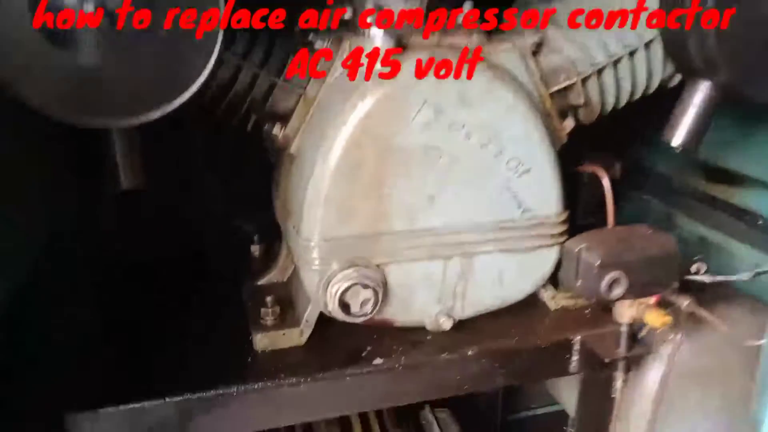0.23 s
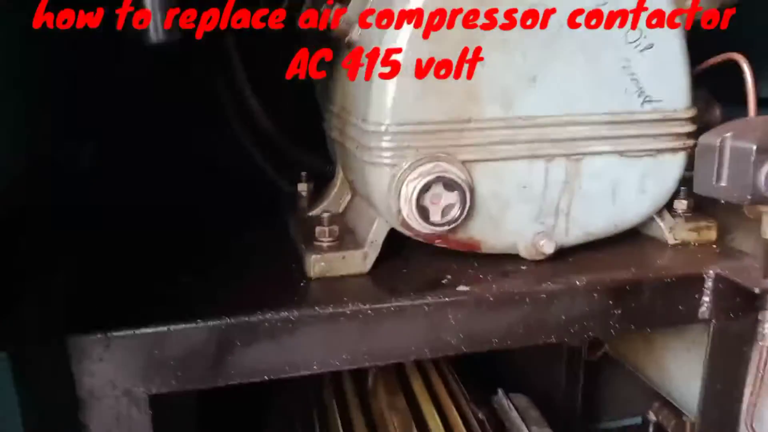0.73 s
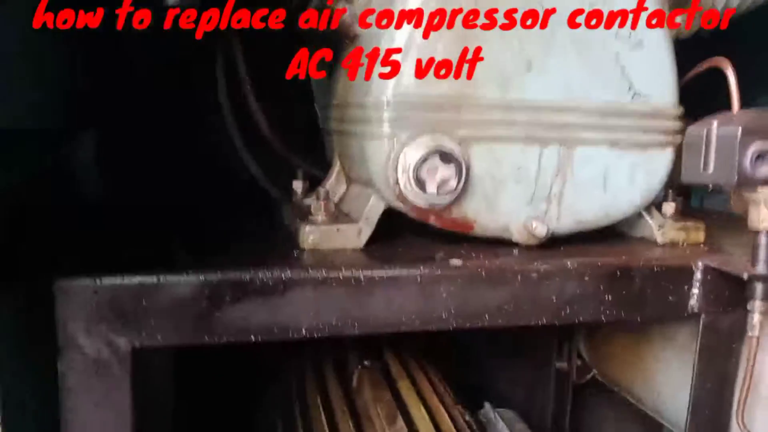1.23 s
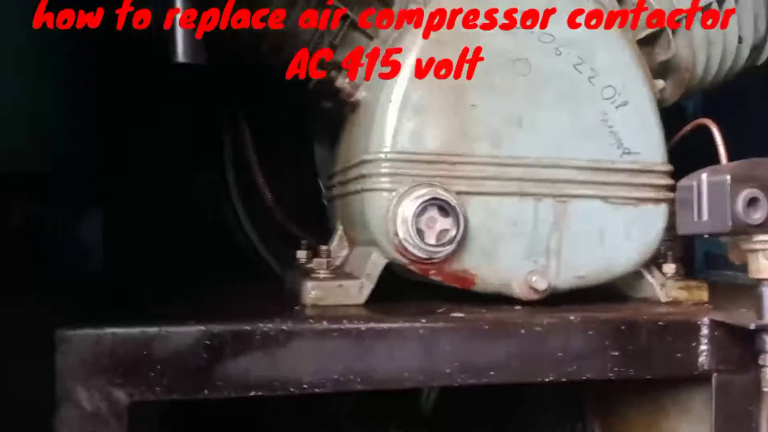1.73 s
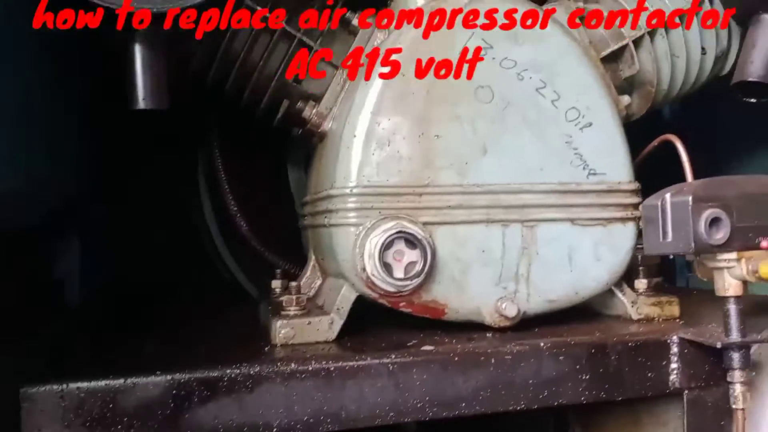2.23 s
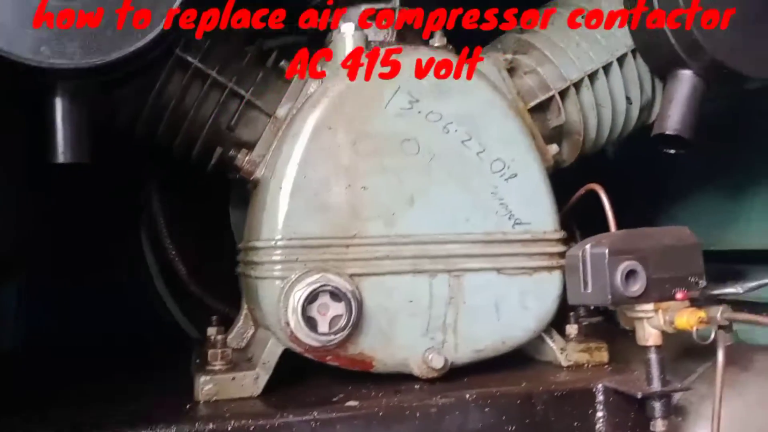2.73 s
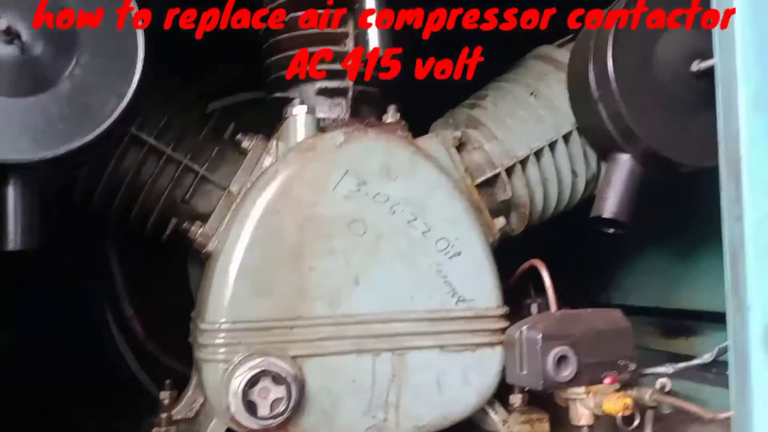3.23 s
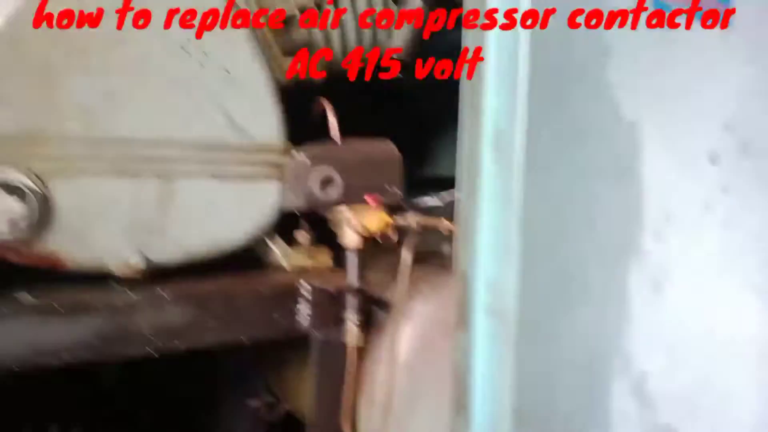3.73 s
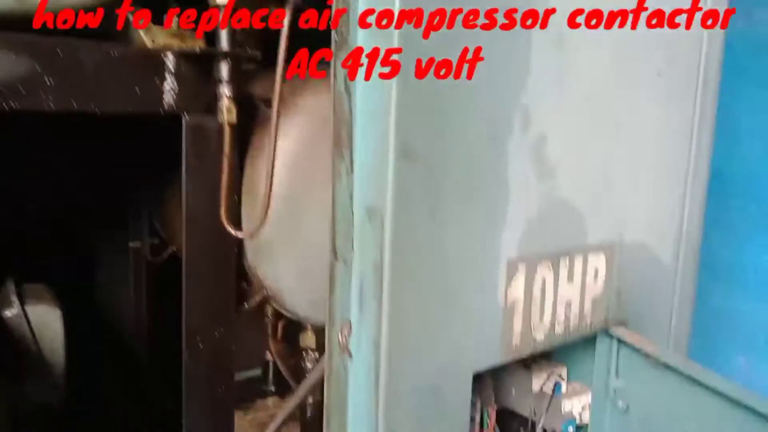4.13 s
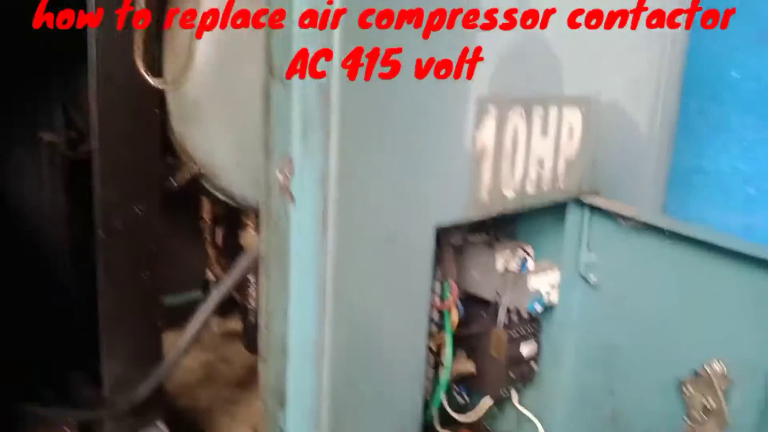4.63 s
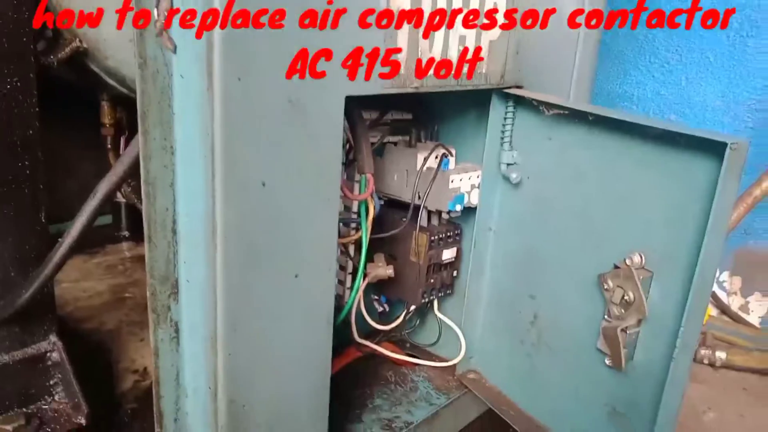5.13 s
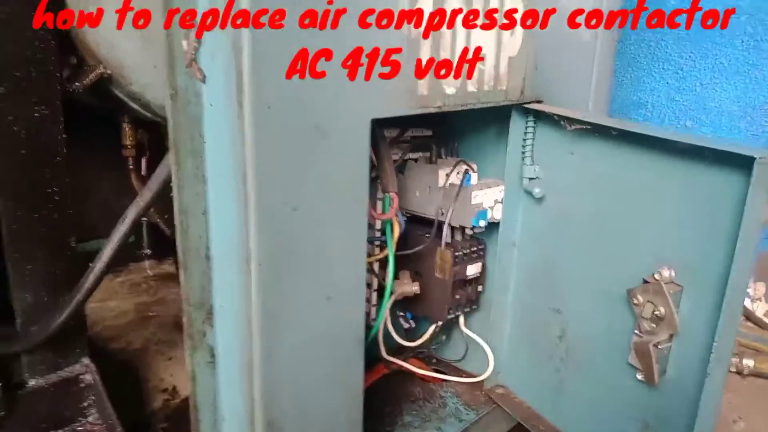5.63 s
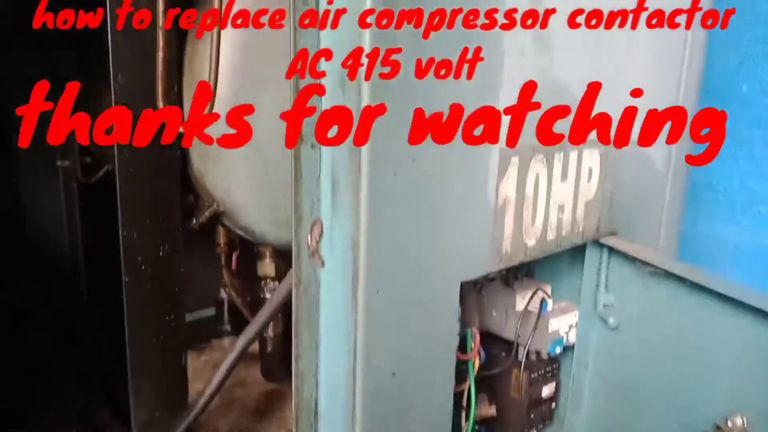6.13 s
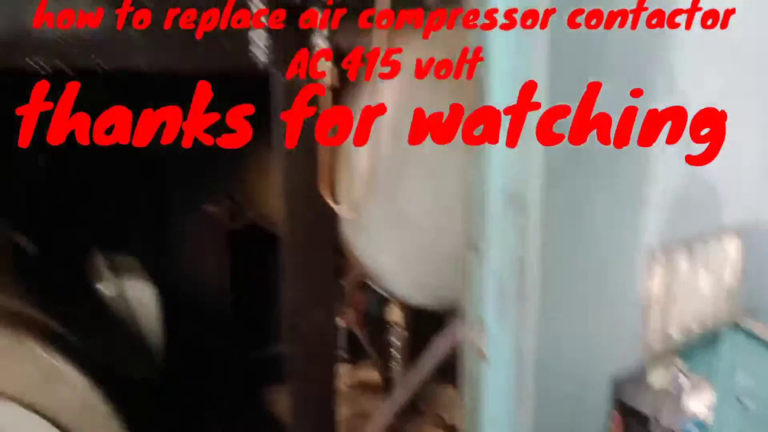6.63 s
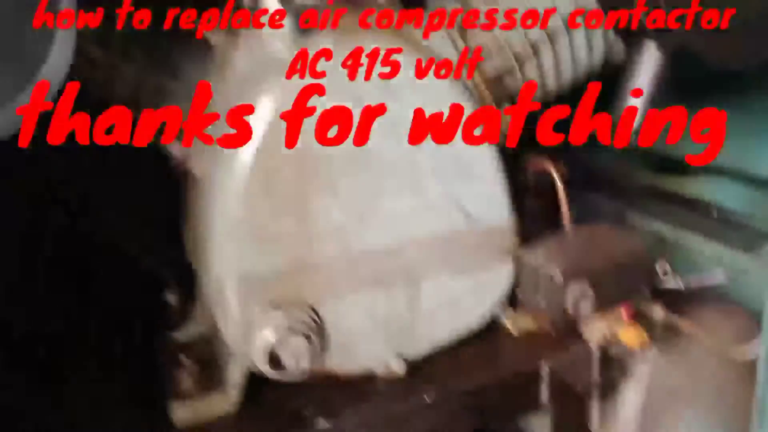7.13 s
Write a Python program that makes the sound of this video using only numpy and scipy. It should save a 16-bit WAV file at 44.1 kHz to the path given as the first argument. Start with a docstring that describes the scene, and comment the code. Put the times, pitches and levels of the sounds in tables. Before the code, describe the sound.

A fast, steady mechanical chugging heard very close: low pulsing boom and drone, rattling crank knocks, crisp reed clicks and puffing air, over flywheel rumble and fan rush. The opening is bright and hissy, then duller and knockier. Midway the treble is subdued; beside the side panel the boom grows, air gushes more and a faint high tone comes and goes. The machine never changes speed or stops.

```python
"""A sheet-steel cabinet, close in: inside, a three-cylinder air compressor runs at a steady 13 turns a second.
On every turn reed valves click three times, three puffs boom through pipework and cabinet, the crank gear knocks.
Puffs are sums of crank-speed multiples; valves, knocks and rushing air are noise bursts timed by the crank.
The microphone starts near the hissing intake, moves to the crankcase, round to the side panel and back;
the hiss is gone after the start, and a faint whistle swells twice beside the panel."""
import sys
import numpy as np
from scipy import signal
from scipy.fft import rfft, irfft, next_fast_len
from scipy.io import wavfile
from scipy.ndimage import uniform_filter1d

SR = 44100
rng = np.random.default_rng(int(sys.argv[2]) if len(sys.argv) > 2 else 0)


def to_wav(s):
    """Save 16-bit WAV."""
    ch = np.atleast_2d(s).T  # columns
    pcm = np.round(np.clip(ch, -1, 1) * 32767)  # PCM
    wavfile.write(sys.argv[1], SR, pcm.astype(np.int16))


N = 325045
TIME = np.arange(N) / SR  # s
CRANK_HZ = 77.9 / 6  # turns per second

# air rushing through the ports: crank angle/degrees, level/dB, decay/s
PORT_GUSHES = [(75.4, 5, 0.0071), (178, 10.5, 0.016)]


def from_db(db):
    """Decibels to amplitude gain."""
    return 10 ** (np.asarray(db) / 20)


def rms_one(x):
    """Scale to unit power."""
    return x / np.sqrt(np.mean(x ** 2) + 1e-20)


def levelled(x):
    """Hold the power at one over every six turns."""
    power = uniform_filter1d(x ** 2, size=round(6 * SR / CRANK_HZ))
    return x / np.sqrt(power + 1e-12)


def in_time(rows):
    """Draw a curve of (time, value) points, sample by sample."""
    s, value = np.transpose(rows)
    return np.interp(TIME, s, value)


def drift(rate_hz):
    """Slow random wander of unit power, in straight lines between random knots."""
    knots = rng.standard_normal(int(N / SR * rate_hz) + 3)
    return rms_one(np.interp(TIME * rate_hz, np.arange(len(knots)), knots))


def coloured(x, points):
    """Filter a sound to a smooth colour that falls 110 dB per octave beyond its ends; unit power."""
    size = next_fast_len(N + 4096)
    hz = np.fft.rfftfreq(size, 1 / SR) + 1e-3
    at, db = np.transpose(points)
    octaves_below = np.maximum(np.log2(at[0] / hz), 0)
    octaves_above = np.maximum(np.log2(hz / at[-1]), 0)
    gain_db = np.interp(np.log(hz), np.log(at), db) - 110 * (octaves_below + octaves_above)
    return rms_one(irfft(rfft(x, size) * from_db(gain_db), size)[:N])


def ringing(x, modes):
    """Drive parallel two-pole resonances, each brought to its own level."""
    out = 0
    for hz, width, db in modes:
        r = np.exp(-np.pi * width / SR)
        poles = [1, -2 * r * np.cos(2 * np.pi * hz / SR), r * r]
        out = out + from_db(db) * rms_one(signal.lfilter([1, 0, -1], poles, x))
    return out


def strokes(turns, contacts, rise_s, tail_db, tail_s, uneven_db, alike):
    """Noise bursts at fixed crank angles with a cabinet tail; the share alike of their grain repeats every turn."""
    power = 0
    for angle, db, decay_s in contacts:
        lap, part = np.divmod(turns - angle / 360 + 2, 1)
        age = part / CRANK_HZ  # s since this contact
        force = from_db(db + uneven_db * rng.standard_normal(128))[lap.astype(int)]
        attack = np.minimum(age / rise_s, 1)
        # the tail of the turn before still sounds
        tail = np.exp(-2 * age / tail_s) * attack + np.exp(-2 * (age + 1 / CRANK_HZ) / tail_s)
        burst = attack * np.exp(-2 * age / decay_s)
        power = power + force ** 2 * (burst + from_db(2 * tail_db) * tail)
    size = round(SR / CRANK_HZ)
    repeated = rng.standard_normal(size)[(turns * size).astype(int) % size]
    fresh = rng.standard_normal(N)
    return np.sqrt(power) * (np.sqrt(alike) * repeated + np.sqrt(1 - alike) * fresh)


def impacts(turns, contacts, colour, rise_s, tail_db, tail_s, alike):
    """Once-a-turn contacts, each with its own ring; returns their sound and the force put into the frame."""
    sound, force = 0, 0
    for angle, db, decay_s, hz, width, ring_db in contacts:
        burst = strokes(turns, [(angle, 0, decay_s)], rise_s, tail_db, tail_s, uneven_db=.5, alike=alike)
        sound = sound + from_db(db) * (coloured(burst, colour) + ringing(burst, [(hz, width, ring_db)]))
        force = force + from_db(db) * burst
    return rms_one(sound), force


def intake(turns):
    """Suction strokes hiss through the filter in a beam: it dulls off its axis and fades outside it."""
    # air drawn in: crank angle/degrees, level/dB, decay/s
    sucks = [(73.5, 2.5, 0.011), (139, -10, 0.004), (190, 5.5, 0.01)]
    # colours on and off the axis: f/Hz, level/dB per Hz
    bright_hiss = [(3200, -12), (4300, 2), (5200, 2.5), (6200, -1), (7000, 2), (8300, -0.5), (9200, -9),
                   (11500, -19)]
    dull_hiss = [(2000, -0.5), (2600, -2), (3400, -1.5), (4200, 3), (4700, -8.5), (5300, -27), (7000, -22)]
    # the microphone turns off the axis from 0.96 s, taking 0.13 s
    off_axis = np.clip((TIME - 0.96) / 0.13, 0, 1)
    # it leaves the beam at 1.556 s: 150 dB down over the next second
    beam = from_db(-150 * np.clip(TIME - 1.556, 0, 1))
    bright_db = np.interp(off_axis, [0, 1], [-31.5, -39])
    dull_db = np.interp(off_axis, [0, 1], [-40, -33.5])
    drawn = strokes(turns, sucks, rise_s=0.0018, tail_db=-9.0, tail_s=0.05, uneven_db=0.5, alike=0.043)
    spill = strokes(turns, PORT_GUSHES, rise_s=0.0034, tail_db=-5.5, tail_s=0.14, uneven_db=1.3, alike=0.08)
    bright = from_db(bright_db) * coloured(drawn, bright_hiss)
    dull = from_db(dull_db) * coloured(spill, dull_hiss)
    return beam * (bright + dull)


def pulsation(turns, station, drone_db, waver_db, scatter):
    """Puffs recurring each turn sound as multiples of the crank speed: a boom and a drone above it."""
    # one puff per cylinder: crank angle/degrees, level/dB
    puffs = [(186, 4.5), (239, 11), (289, 10.5)]
    # resonances of pipework and cabinet: f/Hz, width/Hz
    cavities = [(79, 2.4), (140, 29), (367, 16), (602, 16), (842, 6.2)]
    # standing waves the puffs drive: f/Hz, width/Hz, level by the crankcase/dB, gain per station/dB
    standing_waves = [(78.5, 6.2, -23.5, 0), (90.6, 16, -34.5, 6.5), (137.3, 14.5, -40, 12.5),
                      (161.9, 20.8, -24.5, -2.5), (182.2, 24.5, -32.5, 2.1), (283.5, 126, -41, -3),
                      (338, 8.6, -34.5, -8.5), (351, 12, -33.5, 0.5), (377.8, 42, -35.5, -5.5),
                      (431, 24, -40.5, 2.5), (485, 21.5, -42, -.7), (589, 41, -40.5, 1),
                      (836, 56, -44.5, -2.5), (955, 30, -47.5, 3)]
    angle, puff_db = np.transpose(puffs)
    wave_hz, wave_width, wave_db, wave_slope = np.transpose(standing_waves)
    stations = np.arange(3)
    boom, drone = np.zeros(N), np.zeros(N)
    for order in range(4, 78):
        hz = order * CRANK_HZ
        # the puffs and the cavities set the phase of each multiple
        response = np.sum(from_db(puff_db) * np.exp(-1j * order * np.radians(angle)))
        for centre, width in cavities:
            off_tune = centre ** 2 - hz ** 2
            response *= (off_tune + 1j * hz * centre) / (off_tune + 1j * hz * width)
        # its loudness is that of the standing waves near its pitch, where the microphone stands
        nearness = 1 + (2 * (hz - wave_hz) / wave_width) ** 2
        shares = from_db(wave_db + np.outer(stations - 1, wave_slope)) / nearness
        heard_db = 10 * np.log10(np.sum(shares ** 2, axis=1))
        # short waves change most as the microphone moves through the reflections
        shortness = np.sqrt(hz / 500)
        level = from_db(np.interp(station, stations, heard_db) + waver_db * shortness * drift(2.527))
        phase = np.angle(response) + scatter * shortness * drift(1.94)  # radians
        layer = boom if hz < 220 else drone
        layer += level * np.cos(2 * np.pi * order * turns + phase)
    # the boom grows towards the side panel
    boom_db = -20.5 + 1.35 * (station - 1)
    return from_db(boom_db) * levelled(boom) + from_db(drone_db) * levelled(drone)


def crank_gear(turns, station, blunt_s, drone_db):
    """Knocks once a turn from each part shake castings and cabinet sheets, which clatter and ring."""
    # crank angle/degrees, level/dB, decay/s, ring f/Hz, ring width/Hz, ring level/dB
    knocks = [(174.8, 4, 0.013, 1870, 150, -5.5), (225, -2.5, 0.012, 1980, 130, -3),
              (287.3, -2.5, 0.015, 1340, 77, -3.5)]
    # level of the knocks along the walk: t/s, level/dB
    knock_level = [(0, -33.5), (.45, -37.5), (1.2, -32), (1.5, -32.5), (2, -37), (3.5, -42.5), (4.3, -39.5),
                   (5.4, -34), (6.6, -35), (7, -39), (7.37, -36.5)]
    # colours: f/Hz, level/dB per Hz
    knock_colour = [(900, -9), (1150, 2), (1500, 5), (1680, 4), (1950, 0.5), (2200, -6.5), (2500, -53),
                    (3200, -36)]
    clatter_colour = [(300, 13.5), (450, -3), (620, 9), (730, -17.5), (850, 6), (1000, -10), (1300, -5.5)]
    # rings of castings, cabinet sheets, and the side panel from close by: f/Hz, width/Hz, level/dB
    casting_modes = [(1137, 45, -3.5), (1273, 51, -14), (1511, 19, -3)]
    panel_modes = [(580, 38, 2.5), (807.4, 31, 3)]
    side_modes = [(960, 14, -42)]
    knock_db = in_time(knock_level)
    knock, blows = impacts(turns, knocks, knock_colour, rise_s=blunt_s, tail_db=-14.0, tail_s=0.063, alike=0.73)
    castings = from_db(-6.5) * ringing(blows, casting_modes)
    knock = from_db(knock_db) * rms_one(knock + castings)
    clatter = from_db(drone_db - 13.0) * coloured(blows, clatter_colour)
    panels = from_db(knock_db - 9.0) * ringing(blows, panel_modes)
    # the side panel comes up to full level just past the crankcase
    side = np.interp(station, [1, 1.3], [.25, 1]) * ringing(blows, side_modes)
    return knock + clatter + panels + side


def port_air(turns, by_panel, blunt_s, valve_db):
    """Air gushes through ports that lie beside the valves, stronger beside the panel."""
    # f/Hz, level/dB per Hz
    air_colour = [(1700, 2), (2400, 4.5), (2900, -4), (3500, -0.5), (4200, -5.5), (5200, -16), (7000, -16)]
    gushes = strokes(turns, PORT_GUSHES, rise_s=blunt_s, tail_db=-3.5, tail_s=0.2, uneven_db=3.0, alike=0.029)
    return from_db(valve_db - 4 + 6.5 * by_panel) * coloured(gushes, air_colour)


def reed_valves(turns, by_panel, valve_db):
    """Three closing reeds tick on every turn, each with a thin ring of its own."""
    # crank angle/degrees, level/dB, gain beside the panel/dB, decay/s,
    # ring f/Hz, ring width/Hz, ring level/dB
    closings = [(71.8, 13, 1, 0.0093, 6840, 73, -8), (135, 7.5, 1.5, 0.0039, 8420, 600, -1),
                (197, 11.5, -3.5, 0.0054, 8000, 60, -4)]
    # f/Hz, level/dB per Hz
    valve_colour = [(3200, -9), (4600, -5), (5700, -5), (7000, -1), (8400, 1), (9300, -1), (11200, -7),
                    (13000, -11), (15500, -6.5)]
    reeds = [(angle, db + panel_db * by_panel, *ring) for angle, db, panel_db, *ring in closings]
    ticks, _ = impacts(turns, reeds, valve_colour, rise_s=0.0018, tail_db=-16, tail_s=0.031, alike=0.22)
    return from_db(valve_db) * ticks


def stirred_air(valve_db):
    """The spoked flywheel rumbles and the motor fan rushes: steady noise, coloured."""
    # f/Hz, level/dB per Hz
    rumble_colour = [(20, -20), (45, -16), (80, -5.5), (170, -2), (260, -7), (380, -7.5), (520, -11),
                     (720, -16), (900, -15.5), (1200, -26), (3000, -37)]
    fan_colour = [(1500, -20), (3000, -1), (5500, -16), (8000, -15), (12500, -10), (15500, -12)]
    rumble = from_db(-27.5) * coloured(rng.standard_normal(N), rumble_colour)
    # the fan is heard through the same opening as the valves
    fan = from_db(valve_db - 12.0) * coloured(rng.standard_normal(N), fan_colour)
    return rumble + fan


def whistle():
    """A thin, slightly unsteady 2519 Hz tone swells and fades beside the side panel."""
    # middle t/s, half length/s, level/dB
    swells = [(4.47, .3, -54), (5.4, .25, -58)]
    level = sum(from_db(db) * np.exp(-((TIME - s) / half_s) ** 2) for s, half_s, db in swells)
    return level * np.sqrt(2) * np.sin(2 * np.pi * 2519 * TIME + drift(25))


def scene():
    """Walk the microphone round the cabinet while one crankshaft times the puffs, knocks, valves and air."""
    # microphone walk: t/s, station (0 by the intake, 1 by the crankcase, 2 by the side panel)
    walk = [(0, 0.51), (.5, 0), (1.5, 1), (3.7, 0.91), (4.6, 2.15), (6.3, 2.15), (6.95, 1.23), (7.37, 0.34)]
    # level of the treble, as the cylinder heads come into view and hide again: t/s, level/dB
    heads_level = [(0, -39.5), (.8, -35.5), (1.5, -39.5), (1.8, -46), (3.3, -49.5), (4.4, -48.5),
                   (5.05, -44.5), (5.4, -40), (6.3, -47), (7.37, -44)]
    station = in_time(walk)
    valve_db = in_time(heads_level)
    by_panel = np.clip(station - 1, 0, 1)
    # the drone fades towards the side panel
    drone_db = -26 - 2.5 * (station - 1)
    # at first the microphone closes in by 0.8 m, ever more slowly; sound travels 343 m/s
    path_m = .8 * np.exp(-TIME / .85)
    turns = CRANK_HZ * (TIME - path_m / 343)
    # beside the panel the knocks arrive by reflection, which blunts their attack
    blunt_s = np.interp(by_panel, [0, 1], [.002, .008])
    puffing = pulsation(turns, station, drone_db, waver_db=1.5, scatter=.2)
    gear = crank_gear(turns, station, blunt_s, drone_db)
    air = port_air(turns, by_panel, blunt_s, valve_db)
    valves = reed_valves(turns, by_panel, valve_db)
    # suction pulls the pressure down, hence the minus
    mix = intake(turns) + gear + air + valves + stirred_air(valve_db) + whistle() - puffing
    return mix[None]


def record(dry):
    """Cut the top steeply above 15.7 kHz with an elliptic low-pass."""
    return signal.sosfilt(signal.ellip(12, .2, 80, 15700, fs=SR, output="sos"), dry)


dry = scene()
out = record(dry)
to_wav(out)
```